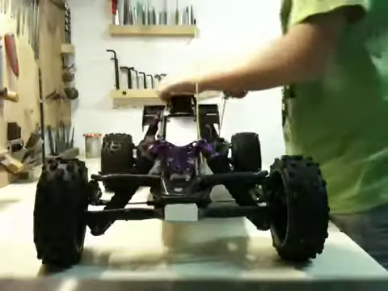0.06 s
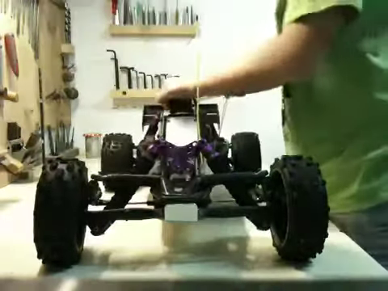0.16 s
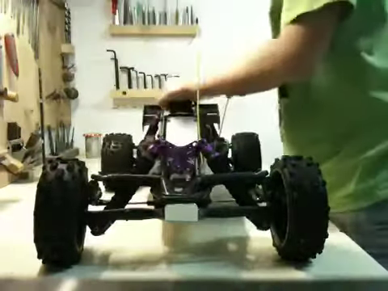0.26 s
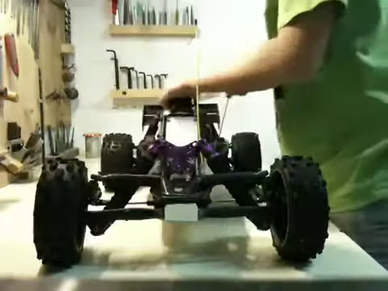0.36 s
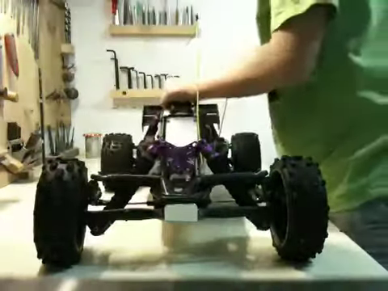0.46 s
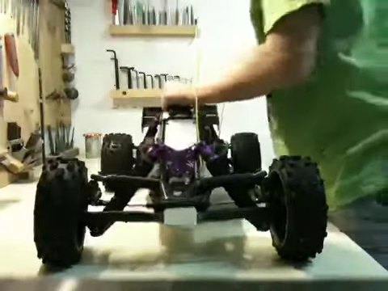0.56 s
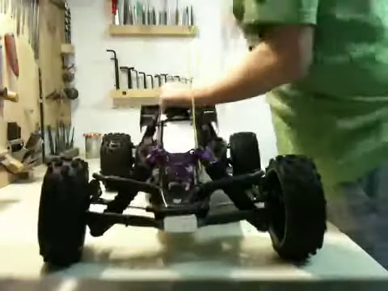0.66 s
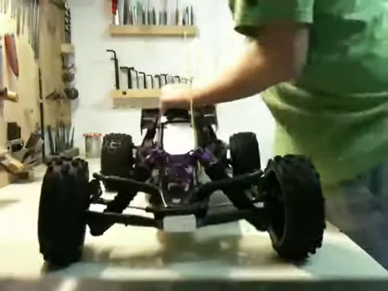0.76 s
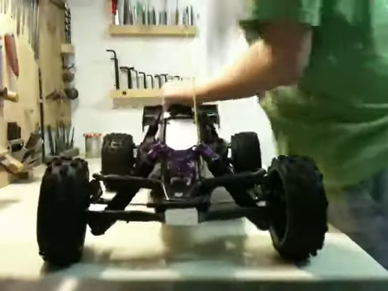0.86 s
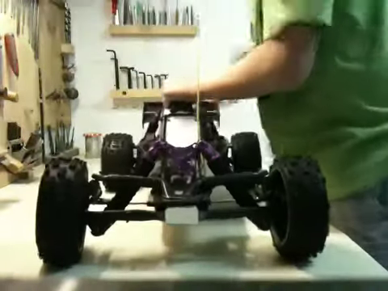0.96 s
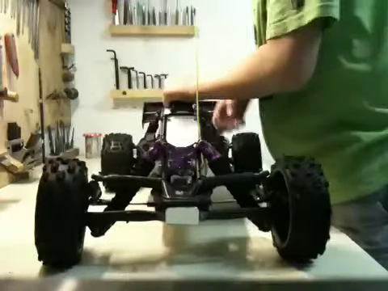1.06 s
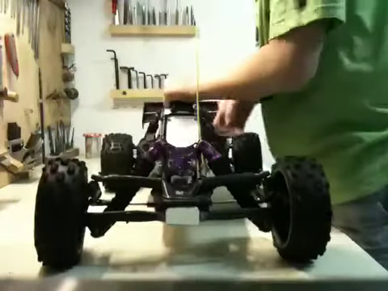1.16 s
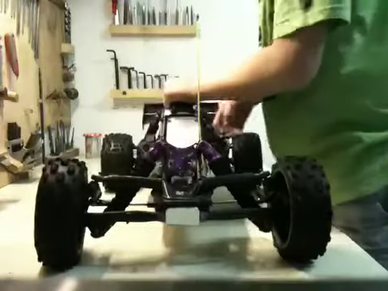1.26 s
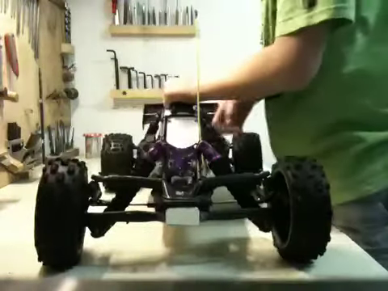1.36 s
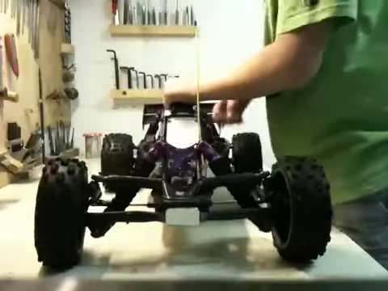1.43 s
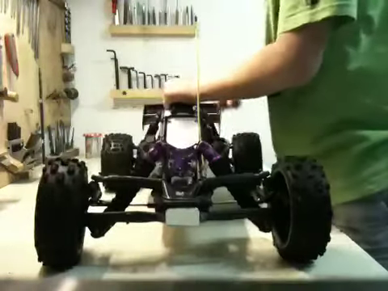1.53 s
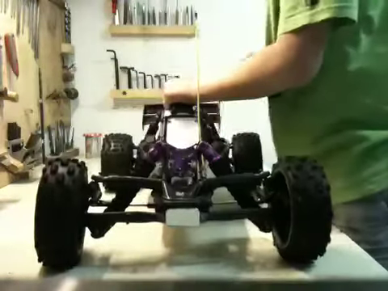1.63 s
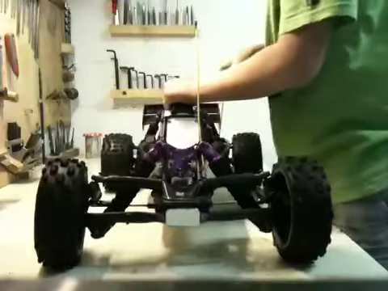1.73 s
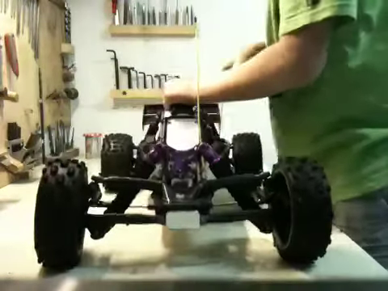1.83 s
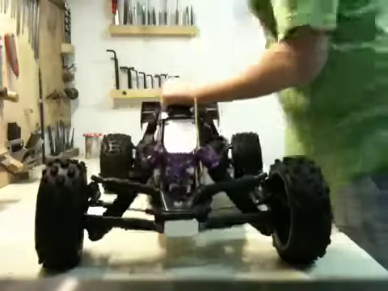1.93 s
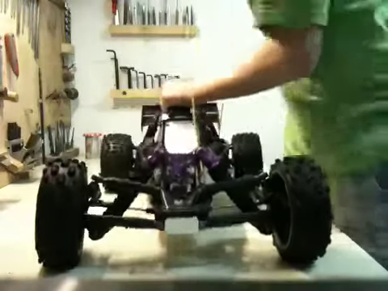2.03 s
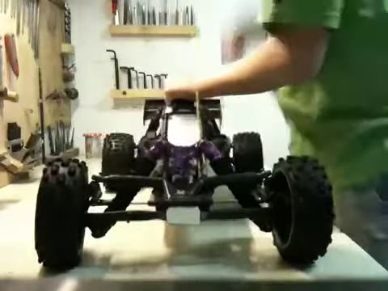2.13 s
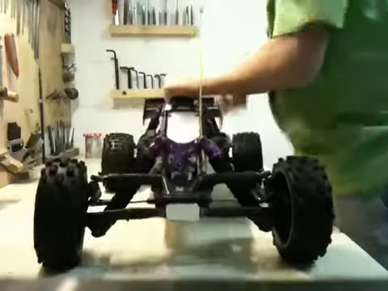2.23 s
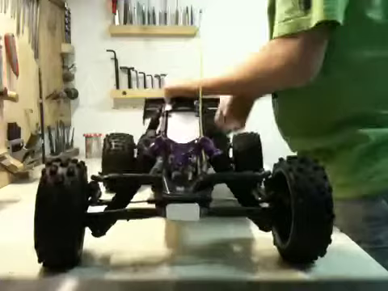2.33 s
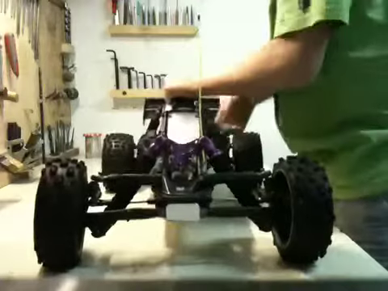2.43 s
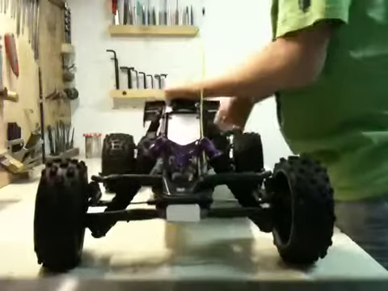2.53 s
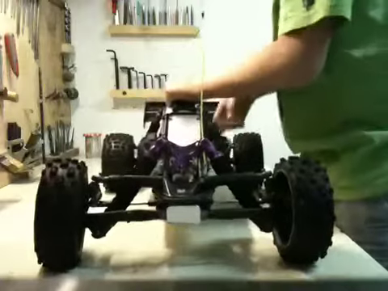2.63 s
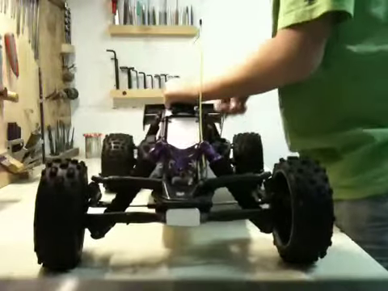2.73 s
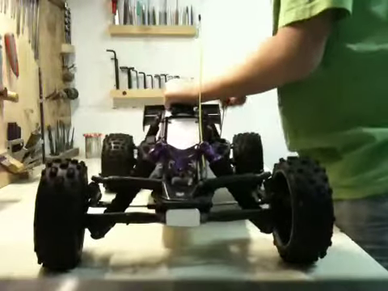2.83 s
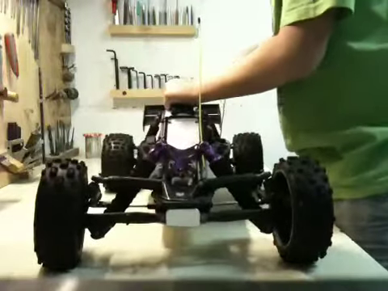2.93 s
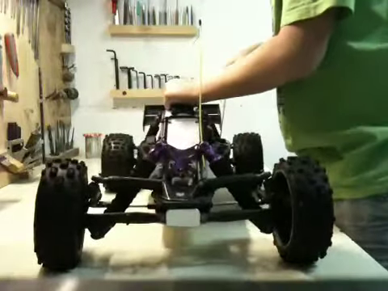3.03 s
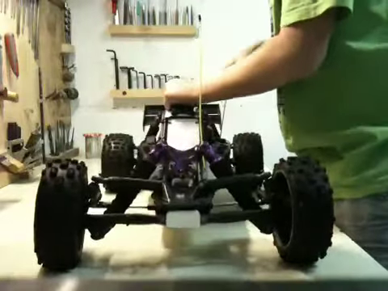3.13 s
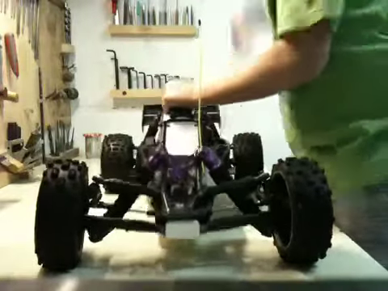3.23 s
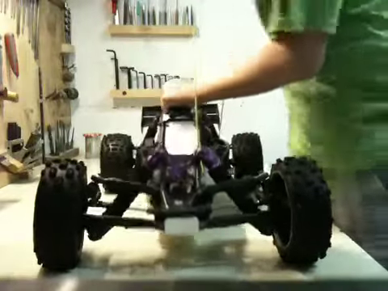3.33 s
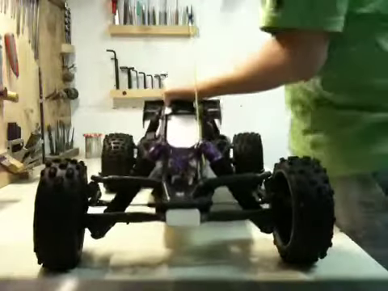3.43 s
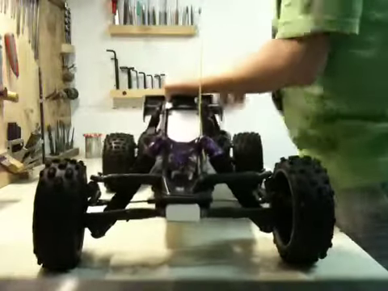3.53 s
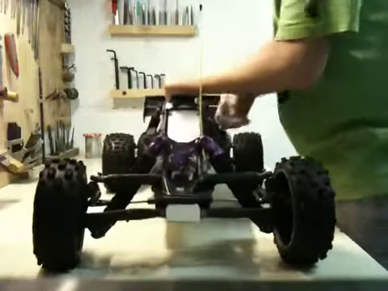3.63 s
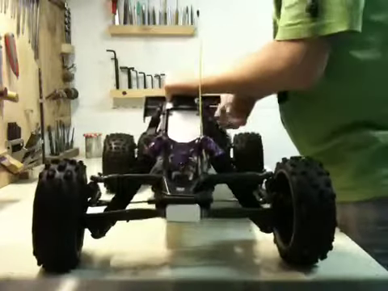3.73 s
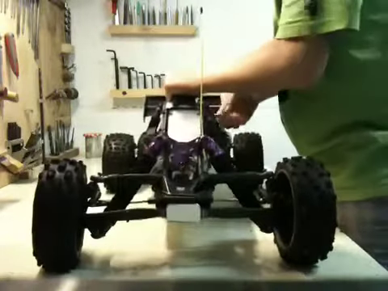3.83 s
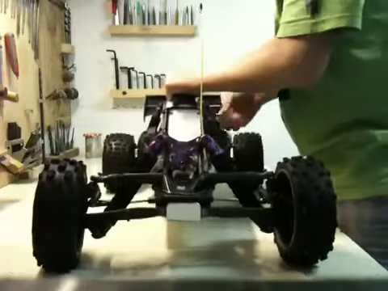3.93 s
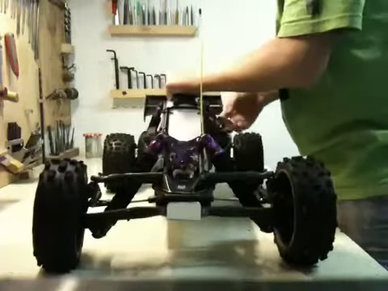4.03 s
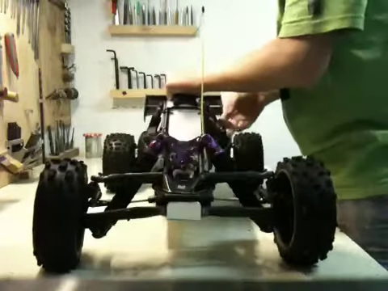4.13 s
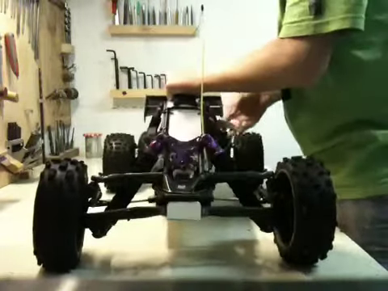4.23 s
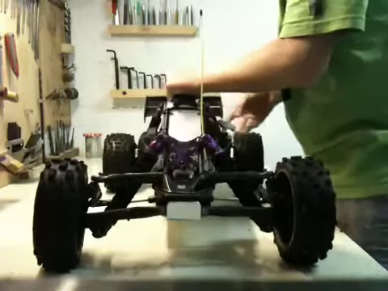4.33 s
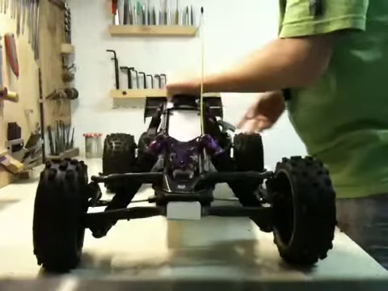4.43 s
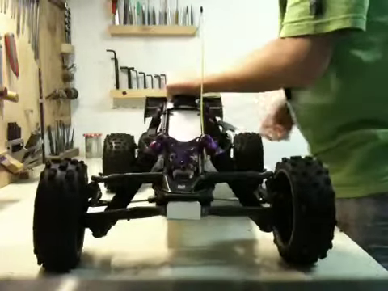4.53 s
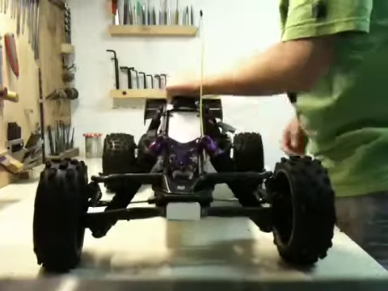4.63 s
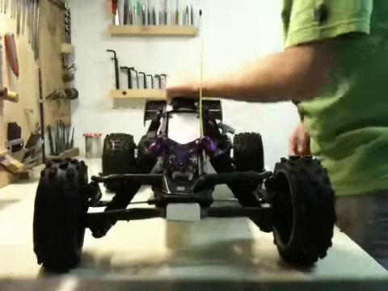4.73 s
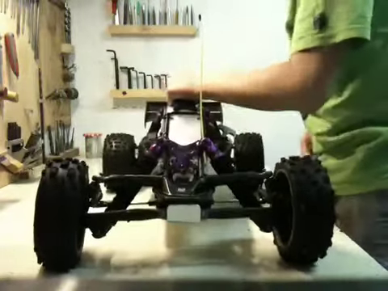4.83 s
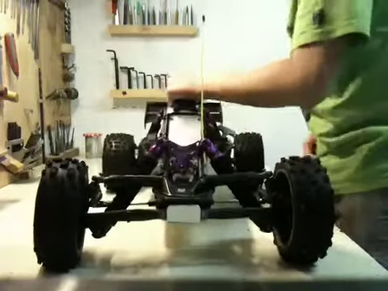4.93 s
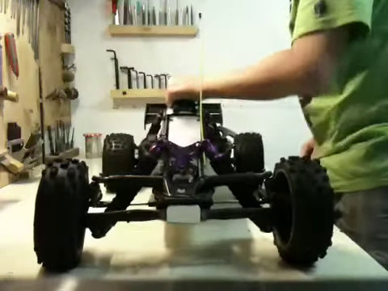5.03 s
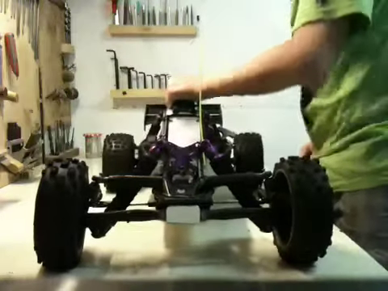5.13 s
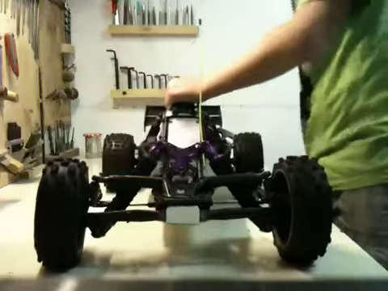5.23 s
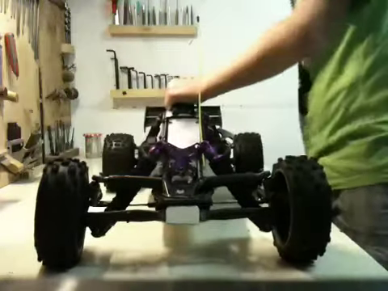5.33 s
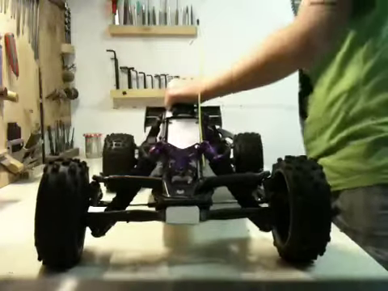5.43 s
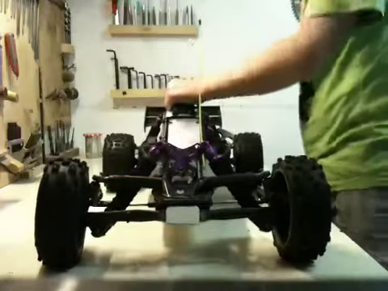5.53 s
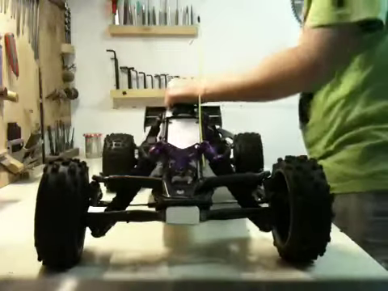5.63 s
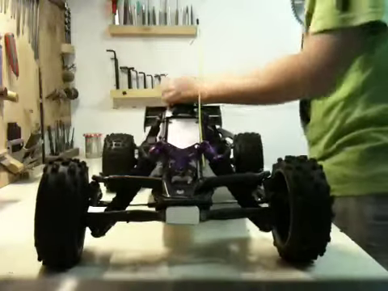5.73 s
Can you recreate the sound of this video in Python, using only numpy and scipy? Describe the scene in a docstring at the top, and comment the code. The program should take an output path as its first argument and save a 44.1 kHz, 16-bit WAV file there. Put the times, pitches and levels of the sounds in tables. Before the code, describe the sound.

A small two-stroke engine on a workbench is pull-started, heard from close by in a hard-walled room. The first two pulls each give a quick whirr and low puffs of air that slow and die, with a metallic ring and the ticking of the rewinding cord. The third pull fires the model buggy's engine, which rises in pitch with irregular sharp pops and settles into a quick, raspy idle.

```python
"""A model buggy's small two-stroke engine, pull-started on a bench in a small, hard-walled workshop.
One microphone stands nearby. On two dead pulls the piston only chuffs air through the silencer
while the starter whirrs, and a spring draws the rattling cord back in. On the third the engine catches
and climbs to a fast idle: its firings sound the exhaust's resonances, and the stronger ones crack sharply."""
import sys
import numpy as np
from scipy import signal
from scipy.io import wavfile
from scipy.ndimage import uniform_filter1d

SR = 44100
rng = np.random.default_rng(int(sys.argv[2]) if len(sys.argv) > 2 else 0)


def unload_wav(signal):
    """Save mono or channel-first audio to the path in sys.argv[1] as 16-bit WAV at rate SR, clipped to [-1, 1]."""
    wavfile.write(
        sys.argv[1],
        SR,
        np.round(np.clip(np.atleast_2d(signal).T, -1, 1) * 32767).astype(np.int16),
    )


N = 254898
TIME = np.arange(N) / SR

# the workshop's reverberation: f/Hz, t60/s
ROOM_DECAY = [(100, 0.7), (250, 0.68), (700, 0.39), (2000, 0.34), (5000, 0.33), (15000, 0.29)]
# low resonances of bench and room: f/Hz, width/Hz, level/dB
BENCH_MODES = [(174, 9, 2), (231, 12, 1)]
# clicks of the starter's pawl and handle: t/s, level/dB
CLICKS = [(0.0978, -41), (0.1974, -52), (0.5365, -55), (1.155, -44), (1.4935, -48), (1.5322, -38),
          (1.604, -45), (1.732, -37.5), (1.94, -39), (2.7803, -36), (2.8438, -43.5), (3.051, -39.5),
          (3.226, -46)]
# knocks of chassis and starter housing: t/s, level/dB, f/Hz
KNOCKS = [(0.099, -44, 690), (0.199, -54, 690), (1.155, -46, 1357), (1.42, -51, 830), (1.735, -45, 720),
          (2.585, -49, 1574), (2.642, -44, 728), (2.69, -51, 900), (2.892, -47, 2330), (3.05, -51, 735)]
# jolts that ring the cooling head: t/s, level/dB
JOLTS = [(0.098, -50.5), (0.848, -31), (1.155, -51), (1.735, -43.5), (2.108, -27), (2.43, -42), (3.05, -45)]
# modes of the cooling head: f/Hz, level/dB, t60/s
HEAD_MODES = [(2961, -15, .65), (3070, -8, .12), (3214, -11, .15), (3634, -15, .17), (4737, -16, .2),
              (5400, -14, .15), (8500, -20, .16)]
# slack cord drawn out before each pull: t/s, level/dB
ZIPS = [(.577, -44), (1.944, -55), (3.226, -43)]
# pulls, timed at the first compression: t/s, level/dB, stroke/s, coasting fade/(dB/s)
PULLS = [(0.742, -1.5, .14, 98), (2.007, -0.6, 0.13, 47), (3.313, -2, 0.14, 73)]
# peaks of the cord's return, as the arm turns and as the handle comes home: t/s, level/dB
REWINDS = [(1.0, 11), (1.55, -1.5), (2.32, 6.5), (2.8, 0.5)]
# crank speed, one curve for each dead pull: t/s, f/Hz
DEAD_SPEEDS = [
    [(.74, 23), (.795, 31), (.87, 23.6), (.92, 19), (1.06, 12), (1.25, 9.3), (1.4, 0)],
    [(2.008, 28.2), (2.055, 35), (2.115, 30.5), (2.2, 19), (2.28, 14.6), (2.35, 17.5), (2.45, 13.5),
     (2.55, 9.8), (2.8, 0)],
]
# crank speed from the pull that catches: t/s, f/Hz
RUN_SPEED = [(3.268, 32), (3.33, 32), (3.37, 39), (3.47, 34), (3.62, 41), (3.8, 54), (4, 65.6),
             (4.18, 70.7), (4.27, 70.8), (4.43, 79.2), (4.56, 76.8), (4.69, 84), (4.77, 84), (4.85, 91),
             (4.92, 92.8), (5.13, 93.2), (5.48, 92.3), (5.68, 93.9)]
# exhaust resonances that pick out the crank's harmonics: f/Hz, width/Hz, level/dB
PIPE_MODES = [(101.6, 24, -38), (226, 23.4, -17.5), (259, 32, -25), (395, 70, -30), (562, 60, -25.5),
              (651, 30, -35), (744, 22, -21.8), (840, 30, -34), (935, 30, -29.5), (1110, 40, -37)]
# strong firings: t/s, level/dB
CRACKS = [(3.532, -15), (3.6073, -18), (3.655, -13.5), (3.7218, -10.5), (3.7816, -9), (3.8364, -6.5),
          (3.8892, -7.5), (3.9532, -10), (4.013, -9), (4.0715, -11.5), (4.117, -12.5), (4.2428, -11),
          (4.2824, -7), (4.3241, -8.5), (4.36, -7.5), (4.5242, -9), (4.562, -3.5), (4.612, -8),
          (4.729, -11), (4.7745, -6.5), (4.8211, -5.5), (4.8645, -5), (4.9077, -7), (4.9512, -12),
          (5.0263, -11), (5.0676, -6), (5.2106, -18.5), (5.284, -10), (5.5, -14), (5.5418, -9),
          (5.597, -8.5), (5.7129, -10.5)]
# the metal pipe's ring after a strong firing: f/Hz, width/Hz, level/dB
CLANG_MODES = [(2580, 850, -7.5), (3395, 230, -6.5)]
# spectra of the sources: f/Hz, relative level/dB
AIR_COLOUR = [(30, -39), (100, -24), (250, -2), (700, -5.5), (3000, -9.5), (8000, -16), (16000, -20)]
CLICK_COLOUR = [(80, -17), (700, 2.5), (3100, 1.5), (4100, -4.5), (5300, 1.5), (9000, -9.5),
                (12000, -21.5)]
EYELET_COLOUR = [(100, -27), (500, 1), (2000, -7), (6000, -7), (7200, -1), (8800, -14), (16000, -31)]
DRUM_COLOUR = [(100, -15), (400, -1.5), (600, 3), (1200, -1.5), (1700, -1), (3000, -8), (4500, -17),
               (9000, -27.5)]
CORD_COLOUR = [(1500, -22), (3500, -2.5), (5500, -1), (7300, -4.5), (10000, -9.5), (12500, -20),
               (16000, -39)]
CHUFF_COLOUR = [(30, -72), (70, -64), (100, -3.5), (130, -15), (170, 3.5), (225, 3.5), (285, 1.5),
                (410, -5), (490, -14), (620, -10.5), (1000, -25), (16000, -55)]
CRACK_COLOUR = [(30, -28.5), (90, -11), (140, -3), (220, 4.5), (700, 8.5), (1250, 7.5), (1700, 3.5),
                (3100, 0), (4200, -4), (5400, -4.5), (10000, -15.5), (16000, -24)]
THUD_COLOUR = [(30, -39), (65, -24.5), (92, 7), (130, -33), (400, -54)]
THRUM_COLOUR = [(30, -90), (75, -23), (138, -20.5), (185, -6), (260, 2), (320, -3.5), (410, 4), (480, -12),
                (1200, -15.5), (8000, -54)]
BARK_COLOUR = [(250, -37.5), (490, -9.5), (570, 10), (730, 8), (950, 2.5), (1200, 5), (1550, -18),
               (2600, -9.5), (6000, -54)]
HISS_COLOUR = [(300, -20), (1000, 7), (1800, 12.5), (3000, 6), (4200, 4), (7000, 1.5), (10000, -3),
               (16000, -19.5)]

CATCH_S, IDLE_HZ = 3.33, 93


def amp(db):
    """Decibels to gain."""
    return 10 ** (np.asarray(db) / 20)


def unit(x):
    """Scales to an rms of one."""
    return x / np.sqrt(np.mean(x ** 2) + 1e-20)


def drift(samples):
    """Slow noise of unit rms, smoothed over so many samples."""
    return unit(uniform_filter1d(rng.standard_normal(N), size=samples))


def curve_at(points, hz):
    """Reads a curve on a log-frequency axis."""
    f, value = np.transpose(points)
    return np.interp(np.log(hz + 1), np.log(f + 1), value)


def colour(x, points, size=4096):
    """A causal filter of unit energy with the given spectrum."""
    log_gain = np.log(amp(curve_at(points, abs(np.fft.fftfreq(size, 1 / SR)))))
    minimum_phase = np.exp(np.conj(signal.hilbert(log_gain)))
    taps = np.fft.ifft(minimum_phase).real[:size // 2]
    return signal.oaconvolve(x, taps / np.linalg.norm(taps))[:N]


def resonate(x, modes):
    """Rings one resonator for each row of f/Hz, width/Hz, level/dB."""
    return sum(amp(db) * signal.lfilter(*signal.iirpeak(hz, hz / width, SR), x)
               for hz, width, db in modes)


def place(rows, shape):
    """Starts a copy of the shape at each row of t/s, level/dB."""
    s, db = np.transpose(rows)
    impulses = np.bincount((s * SR).astype(int), amp(db), N)[:N]
    return signal.oaconvolve(impulses, shape)[:N]


def bursts(rows, hold_s, fall_s, rise_s):
    """A puff of noise for each row: it rises, holds and dies away."""
    t = np.arange(SR // 5) / SR
    shape = (1 - np.exp(-t / rise_s)) * np.exp(-np.maximum(t - hold_s, 0) / fall_s)
    return place(rows, shape) * rng.standard_normal(N)


def swell(peak_s, hold_s, rise, fade):
    """A gain that climbs, holds and dies away; rise and fade in dB/s."""
    return amp(-rise * np.maximum(peak_s - TIME, 0) - fade * np.maximum(TIME - peak_s - hold_s, 0))


def room_tone():
    """The quiet air of the workshop, all round the microphone."""
    return amp(-70.5) * colour(rng.standard_normal(N), AIR_COLOUR)


def room(x, wet_db):
    """Dense wall reflections reach the microphone after the direct sound; each band has its own decay."""
    size = SR * 3 // 4
    taps = rng.standard_normal(size) * (rng.random(size) < 4000 / SR)
    taps[:SR // 300] = 0  # gap before the first reflection
    hz, t, spectrum = signal.stft(taps, SR, nperseg=256)
    decay = amp(-60 * t / curve_at(ROOM_DECAY, hz)[:, None])
    tail = signal.istft(spectrum * decay, SR, nperseg=256)[1]
    wet = signal.oaconvolve(x, tail / np.linalg.norm(tail))[:N]
    return (x + amp(wet_db) * wet) / np.sqrt(1 + amp(wet_db) ** 2)


def boom(x):
    """Bench and room hang on to the low end of each puff."""
    return x + resonate(x, BENCH_MODES)


def knock(s, db, hz, q=5.5):
    """A bumped plastic part: a brief scuffle through a broad resonance and a fainter one above."""
    scuffle = bursts([(s, db)], hold_s=.0075, fall_s=.0093, rise_s=.00079)
    return sum(gain * signal.lfilter(*signal.iirpeak(f, q, SR), scuffle) * np.sqrt(SR / f)
               for f, gain in [(hz, 1), (hz * 2.4, amp(-10))])


def handling():
    """On the bench, pawl and handle tick, plastic parts knock, and jolts ring the cooling head."""
    t = np.arange(SR) / SR
    ring = sum(amp(db - 60 * t / t60) * np.sin(2 * np.pi * hz * t) for hz, db, t60 in HEAD_MODES)
    ticks = colour(bursts(CLICKS, hold_s=.0049, fall_s=.0097, rise_s=.00029), CLICK_COLOUR)
    knocks = sum(knock(*row) for row in KNOCKS)
    knocks = signal.lfilter(*signal.butter(2, [400, 3200], "band", fs=SR), knocks)
    return room(amp(-6) * ticks, wet_db=-1.5) + room(knocks, wet_db=-6) + place(JOLTS, ring)


def slack_cord(start_hz=62, climb_hz_per_s=1500, tick_s=.0025, length_s=.095):
    """Before each pull the loose cord ticks out through its eyelet, faster and faster, into a zip."""
    t = np.arange(SR // 5) / SR
    tick_count = start_hz * t + climb_hz_per_s * t ** 2 / 2
    age_s = (tick_count % 1) / (start_hz + climb_hz_per_s * t)
    fade = amp(-306 * np.maximum(t - length_s, 0))
    slide = place(ZIPS, np.exp(-age_s / tick_s) * fade) * rng.standard_normal(N)
    return room(colour(slide, EYELET_COLOUR), wet_db=-2)


def pulling(db, delay_s, fade_scale):
    """Gain of a starter part: up as the arm takes the load, down as the crank coasts."""
    gain = np.zeros(N)
    for s, pull_db, stroke_s, fade in PULLS:
        spin_up = swell(s + .068, 0, rise=47, fade=0)  # the drum gains speed past the first compression
        stroke = swell(s + delay_s, stroke_s - delay_s, rise=362, fade=fade * fade_scale)
        gain += amp(db + pull_db) * spin_up * stroke
    return gain


def rewinding(db, rise, fade):
    """Gain of a starter part while the spring draws the cord home."""
    return sum(amp(db + surge_db) * swell(s, 0, rise, fade) for s, surge_db in REWINDS)


def rubbing(grains, grit, snag_db):
    """Gritty noise that wavers as the cord catches and slips many times a second."""
    return unit((rng.standard_normal(N) + grit * unit(grains)) * amp(snag_db * drift(350)))


def starter():
    """The ratchet rattles over the spinning drum and the cord scratches through its guide."""
    teeth, fibres = (rng.random((2, N)) < 400 / SR) * rng.standard_normal((2, N))
    drum_gain = pulling(-30, delay_s=.012, fade_scale=1.44) + rewinding(-60, rise=68, fade=56)
    cord_gain = pulling(-38, delay_s=.016, fade_scale=1.42) + rewinding(-55, rise=260, fade=177)
    whirr = colour(rubbing(teeth, grit=.45, snag_db=1.5) * drum_gain, DRUM_COLOUR)
    scratch = colour(rubbing(fibres, grit=.41, snag_db=2) * cord_gain, CORD_COLOUR)
    return room(whirr + scratch, wet_db=-10.5)


def crank(speed):
    """Crank angle in turns and speed in Hz along a speed curve."""
    hz = np.interp(TIME, *np.transpose(speed), left=0)
    return np.cumsum(hz) / SR, hz


def puffs(turns, hz, uneven_db, gas, decay_s):
    """Each turn the port opens: a pressure pulse of uneven strength and a short rush of gas."""
    cycle = np.ceil(turns).astype(int)
    strength = amp(uneven_db * np.clip(rng.standard_normal(N), -2, 2))[cycle]
    pulse = np.diff(cycle, prepend=0) * np.sqrt(SR / (hz + 1))
    age_s = (turns % 1) / (hz + 1)
    rush = np.exp(-age_s / decay_s) * np.sqrt(2 / (decay_s * (hz + 1))) * rng.standard_normal(N)
    return strength * (pulse + gas * rush) * (hz > 0) / np.sqrt(1 + gas ** 2)


def dead_pulls(leak_hz=21.4):
    """The piston pumps unburnt air through the silencer; below leak_hz the air leaks out quietly."""
    air = np.zeros(N)
    for speed in DEAD_SPEEDS:
        turns, hz = crank(speed)
        pressure = (hz / leak_hz) ** 5.46
        air += puffs(turns, hz, uneven_db=.7, gas=.25, decay_s=.012) * pressure / (1 + pressure)
    return amp(-23) * room(boom(colour(air, CHUFF_COLOUR)), wet_db=-6.5)


def caught(hz):
    """Gain of the engine as it comes in on the last pull, its first turns still weak."""
    return swell(CATCH_S, 0, rise=495, fade=0) * (hz > 0)


def growing(hz, idle_db, db_per_octave):
    """Gain of an engine voice that grows with crank speed."""
    return caught(hz) * amp(idle_db + db_per_octave * np.log2(np.maximum(hz, 1) / IDLE_HZ))


def peaking(hz, top_db, best_hz, loss_db):
    """Gain of an exhaust voice, down by loss_db an octave either side of its best crank speed."""
    return caught(hz) * amp(top_db - loss_db * np.log2(np.maximum(hz, 1) / best_hz) ** 2)


def cracks():
    """Now and then a full charge bursts out with a short rising zing; the metal pipe clangs after it."""
    blast = bursts(CRACKS, hold_s=.006, fall_s=.008, rise_s=.0003)
    glide_hz = np.geomspace(2400, 3900, SR // 140)
    zing = np.sin(2 * np.pi * np.cumsum(glide_hz) / SR) * signal.windows.tukey(len(glide_hz), .5)
    bang = amp(-1.5) * colour(blast, CRACK_COLOUR)
    return room(bang + resonate(blast, CLANG_MODES) + place(CRACKS, amp(-4) * zing), wet_db=-3)


def exhaust_note():
    """Straight from pipe to microphone: the crank's harmonics swell as they climb through resonances."""
    turns, hz = crank(RUN_SPEED)
    turns += .003 * drift(1500)  # slight phase wobble
    grid_hz = np.arange(SR // 20)
    response = sum(amp(db) / (1 + (2 * (grid_hz - centre) / width) ** 4)
                   for centre, width, db in PIPE_MODES)
    note = np.zeros(N)
    for k in range(1, 15):
        gain = growing(hz, idle_db=.7, db_per_octave=1.4 * k)  # high harmonics come in last
        note += gain * np.interp(k * hz, grid_hz, response) * np.cos(2 * np.pi * (k * turns + rng.random()))
    return np.sqrt(2) * note


def engine():
    """Firings drive the port's thud, the silencer's thrum, the pipe's bark and the mechanism's hiss."""
    turns, hz = crank(RUN_SPEED)
    turbulence = (hz / 56) ** 2  # clean chuffs when slow, a ragged rush at speed
    exhaust = puffs(turns, hz, uneven_db=.8, gas=turbulence, decay_s=.005)
    blowdown = puffs(turns, hz, uneven_db=1, gas=2.2, decay_s=.007)
    clatter = puffs(turns, hz, uneven_db=1, gas=8, decay_s=.012)
    thud = colour(exhaust * growing(hz, idle_db=-47, db_per_octave=1.5), THUD_COLOUR)
    thrum = colour(exhaust * peaking(hz, top_db=-19.5, best_hz=59.7, loss_db=6.3), THRUM_COLOUR)
    bark = colour(blowdown * peaking(hz, top_db=-21.3, best_hz=92, loss_db=8), BARK_COLOUR)
    hiss = colour(clatter * growing(hz, idle_db=-23, db_per_octave=11.7), HISS_COLOUR)
    return thud + room(boom(thrum) + bark + hiss, wet_db=-3)


def scene():
    """Everything on the bench over the room tone, in mono at the microphone."""
    air = room_tone()
    motor = dead_pulls() + engine() + exhaust_note() + cracks()
    return (air + motor + slack_cord() + starter() + handling())[None]


def record(dry, ceiling=.7, edge_hz=16100):
    """The microphone rounds off the loudest peaks; the treble ends at edge_hz."""
    rounded = dry / (1 + (dry / ceiling) ** 6) ** (1 / 6)
    lowpass = signal.firwin(511, edge_hz, window=("kaiser", 9), fs=SR)
    return signal.oaconvolve(rounded, lowpass[None], "same")


dry = scene()
out = record(dry)
unload_wav(out)
```